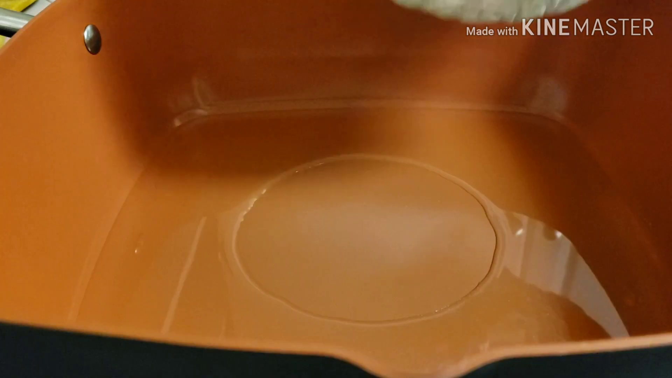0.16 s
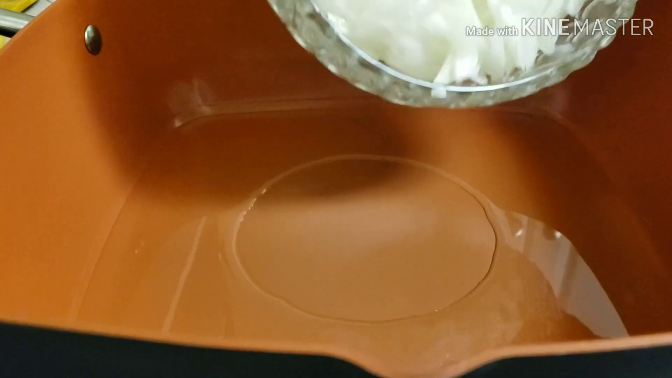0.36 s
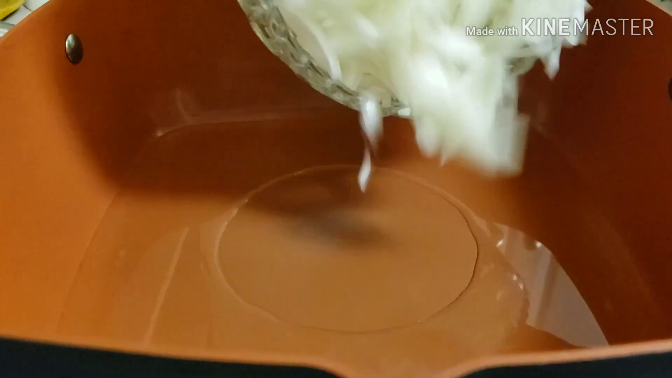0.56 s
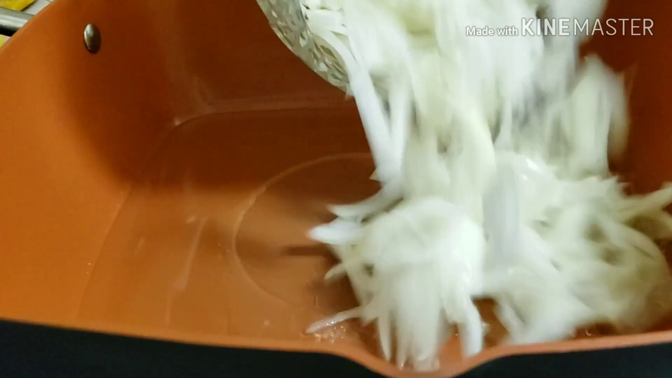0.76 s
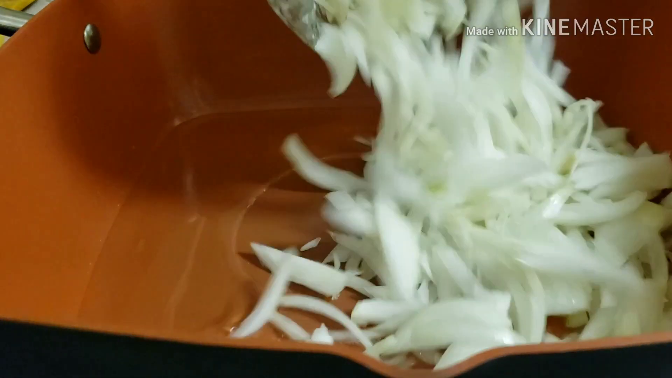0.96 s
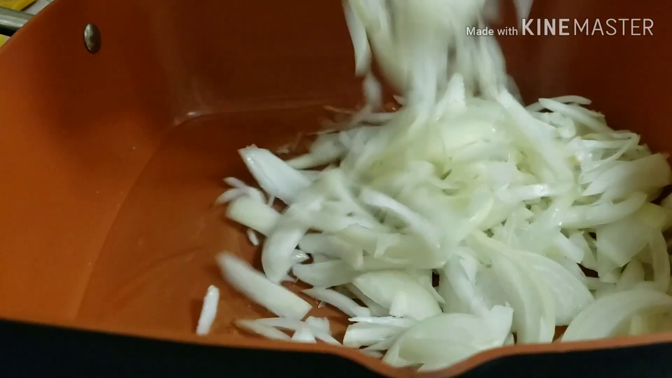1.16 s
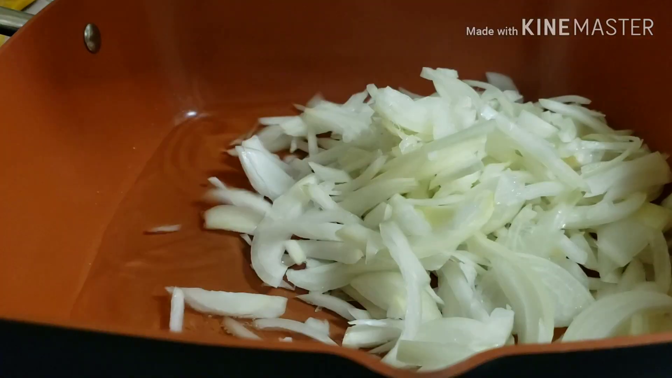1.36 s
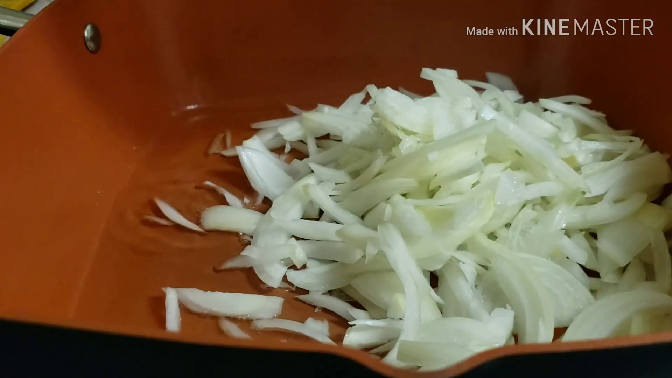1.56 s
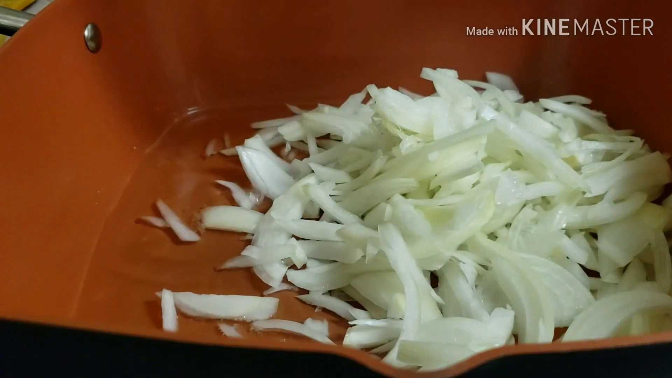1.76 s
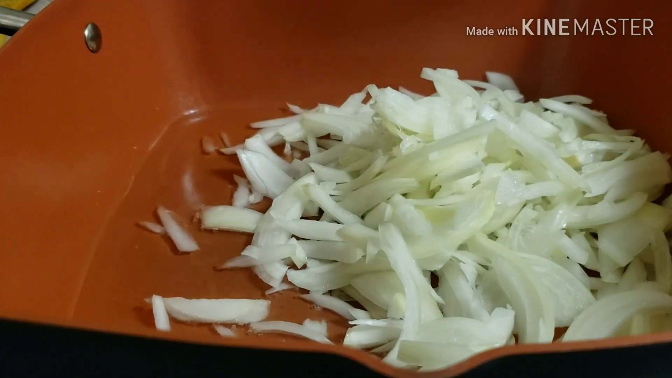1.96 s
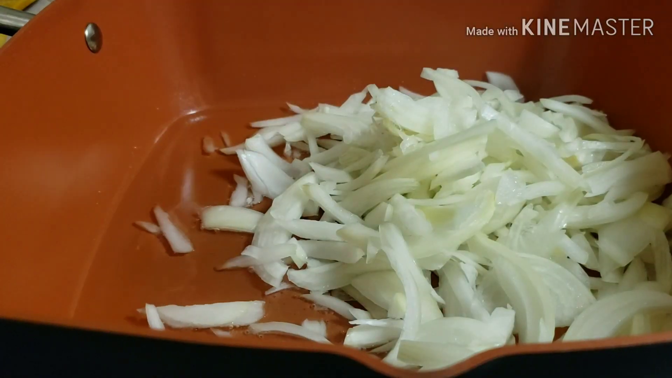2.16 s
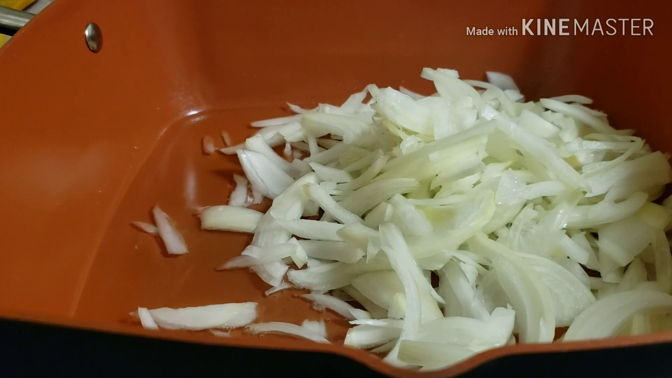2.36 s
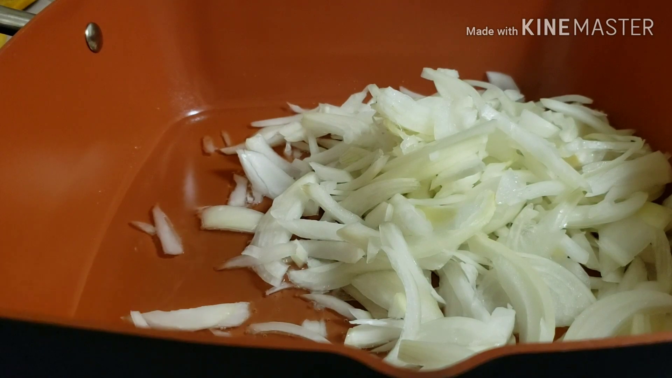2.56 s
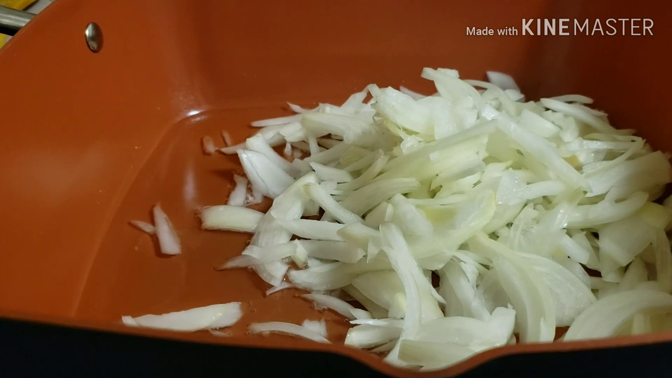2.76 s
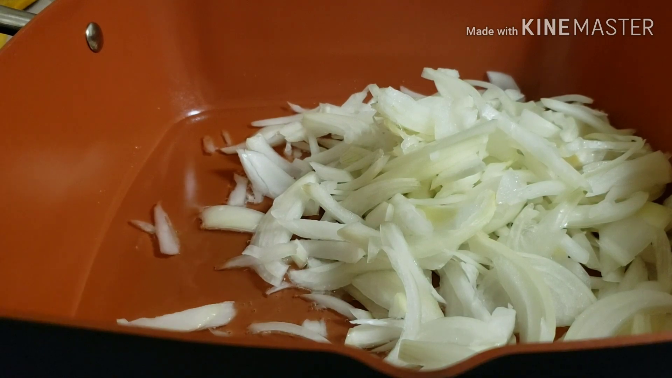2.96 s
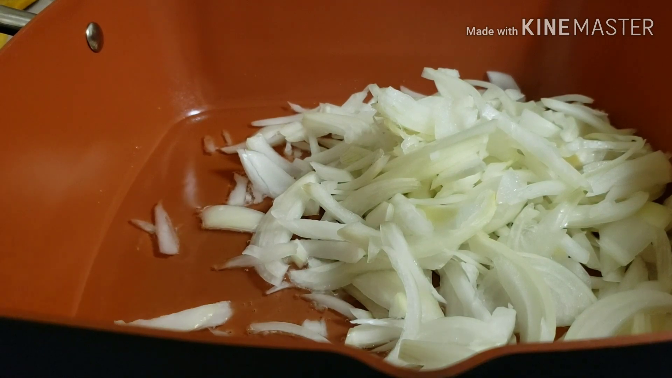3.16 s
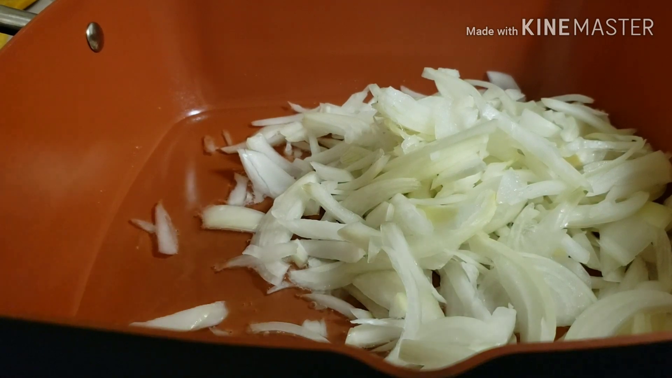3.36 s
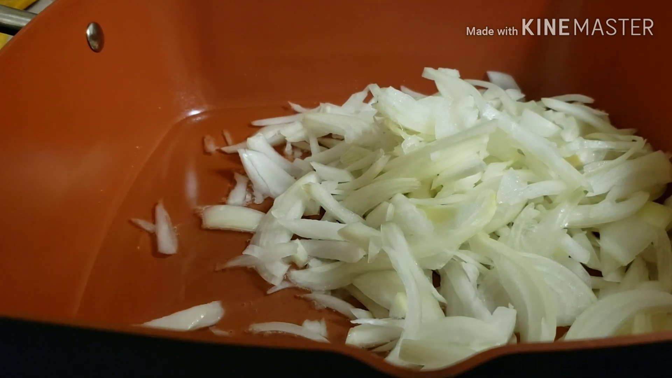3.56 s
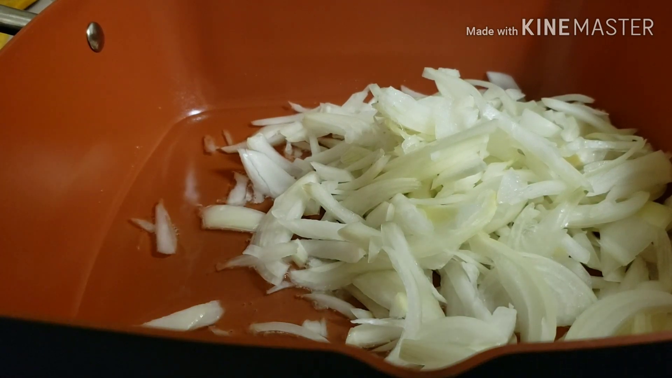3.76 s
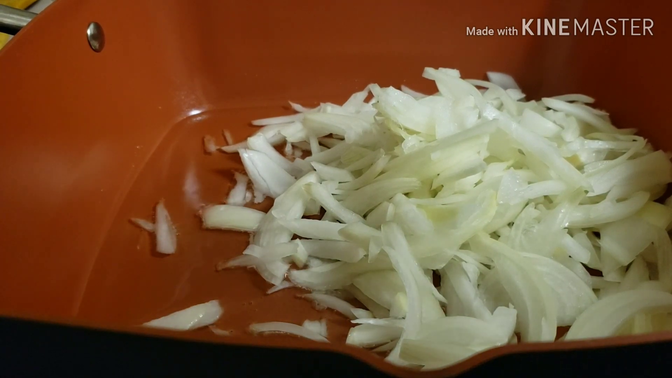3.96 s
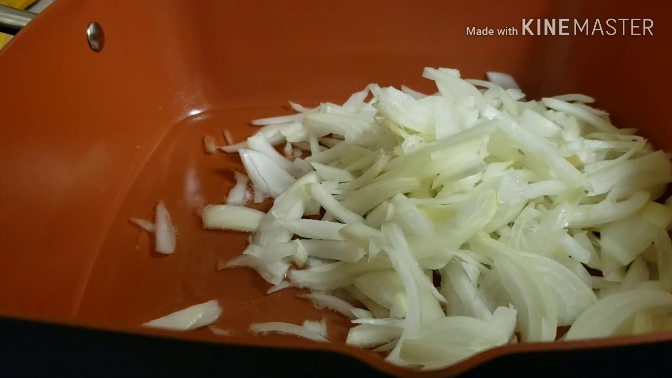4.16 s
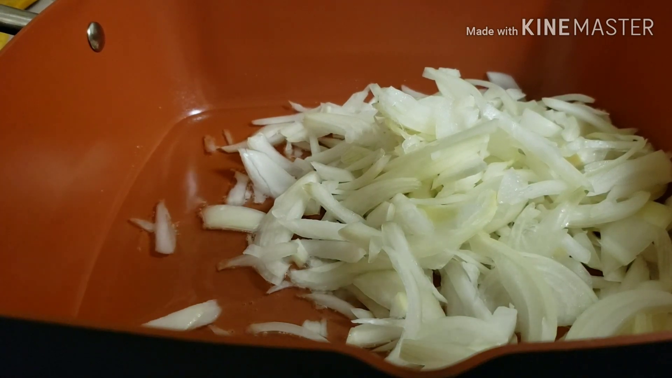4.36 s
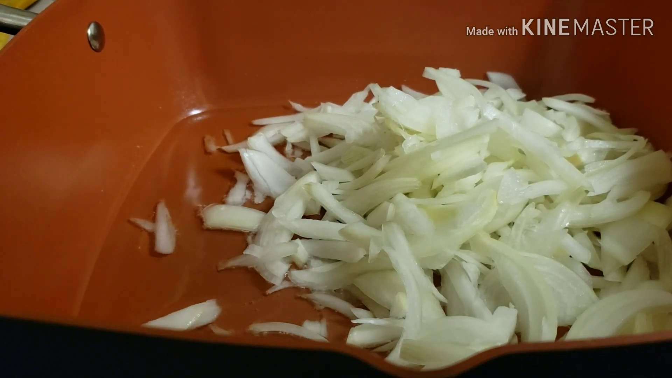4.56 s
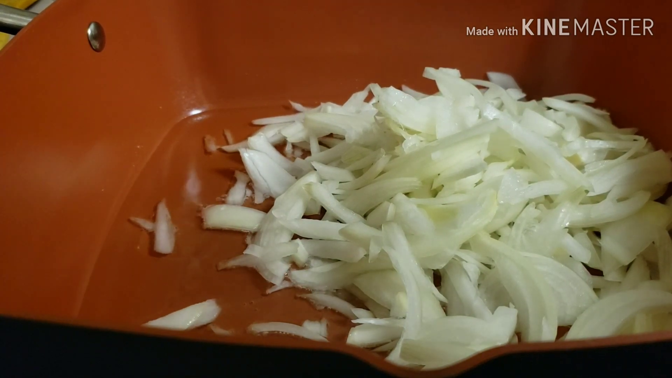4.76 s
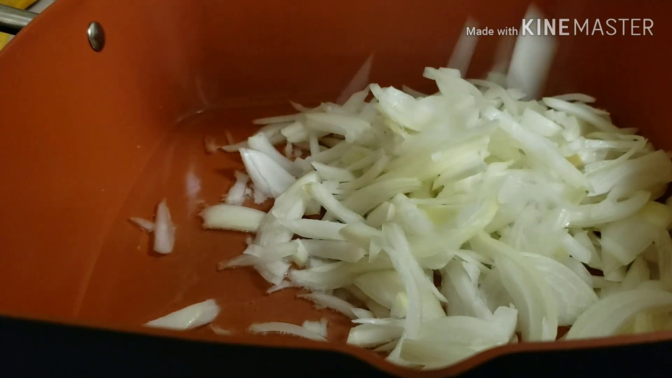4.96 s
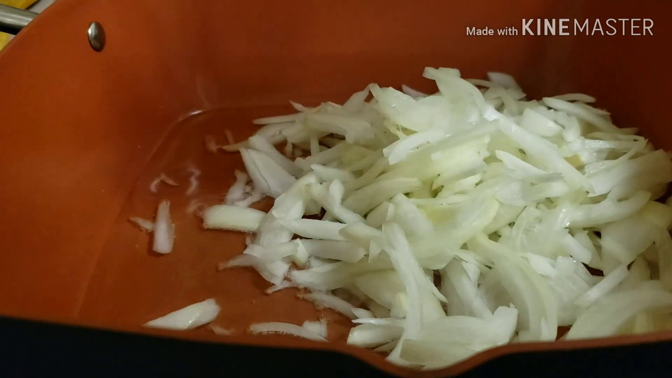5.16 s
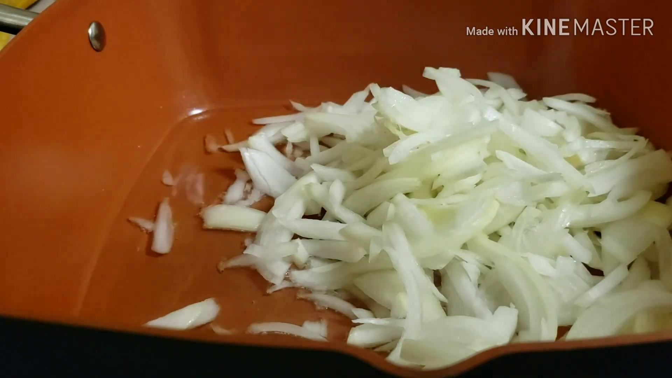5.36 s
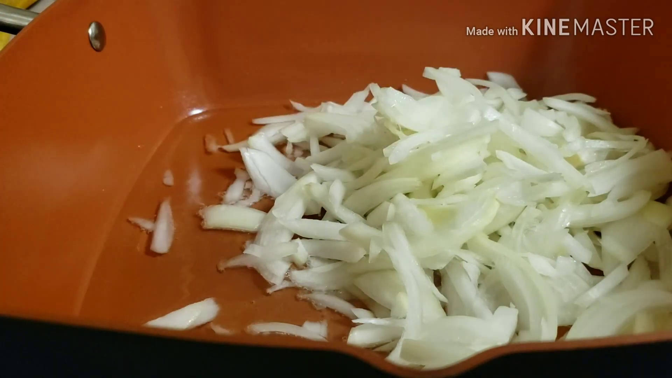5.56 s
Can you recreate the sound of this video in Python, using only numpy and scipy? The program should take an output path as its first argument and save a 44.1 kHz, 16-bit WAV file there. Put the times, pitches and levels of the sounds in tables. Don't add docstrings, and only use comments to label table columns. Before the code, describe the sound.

Close stereo pickup of a pot on the stove: quiet low rumble first, then one loud hard clack of glass on the rim, wet slices landing dully and a crisp sizzle rising at once. The frying stays steady and fine-grained. A quick clattering bounce of the bowl on the counter follows, then late popping spits of oil, in a small kitchen with short reflections.

```python
import sys
import numpy as np
from scipy import signal
from scipy.fft import rfft, irfft, next_fast_len
from scipy.io import wavfile
from scipy.ndimage import uniform_filter1d

SR = 44100
rng = np.random.default_rng(int(sys.argv[2]) if len(sys.argv) > 2 else 0)


def gain_from_db(level_db):
    decades = np.asarray(level_db, float) / 20
    return 10 ** decades


def log_audio(samples):
    frames = np.atleast_2d(samples).T
    limited = np.clip(frames, -1, 1)
    pcm = np.round(limited * 32767).astype(np.int16)
    wavfile.write(sys.argv[1], SR, pcm)


N = 247842
SIZE = next_fast_len(N + SR)
HZ = np.arange(SIZE // 2 + 1) * SR / SIZE + 1e-3
TIME_S = np.arange(N) / SR

# frequency in Hz, level in dB per Hz.
KITCHEN_COLOUR = [(15, -44), (25, -28), (38, -10.5), (70, -4), (102, -14.5), (133, -9), (189, -18.5),
                  (291, -20.5), (333, -19), (382, -26.5), (461, -25), (513, -27), (1980, -51),
                  (7630, -56.5), (15800, -66)]
# centre in Hz, width in Hz, level in dB.
FAN = (126, 7, -57)
# centre in seconds, half length in seconds, added level in dB.
SHAKE = (2.93, 0.18, 5.3)
# frequency in Hz, t60 in seconds.
ROOM_T60 = [(100, 0.43), (600, 0.57), (1500, 0.42), (4000, 0.24), (12000, 0.18)]
# frequency in Hz, likeness 0 to 1.
ALIKE = [(60, 1), (130, 0.98), (290, 0.83), (640, 0.29), (1100, 0.08), (1700, 0.79), (3100, 0.21),
         (6000, 0)]
# frequency in Hz, left minus right in dB.
LEFT_DB = [(60, 1.5), (110, 3.5), (200, 1), (380, -1.5), (700, 1), (1290, 1.5), (2380, 1), (4400, 1),
           (8120, 2.5), (15000, 4.5)]

# start in seconds, thud level in dB.
BOUNCES = [(2.7487, -22.5), (2.7526, -22.5), (2.7565, -22.5), (2.77, -28), (2.787, -32), (2.819, -29.5),
           (2.85, -50), (2.93, -27), (2.938, -26.5), (2.95, -37), (2.961, -30), (2.975, -32), (2.993, -21),
           (2.998, -22.5), (3.011, -21.5), (3.034, -29.5), (3.069, -31.5), (3.568, -43), (4.447, -39)]
# frequency in Hz, level in dB, t60 in seconds.
COUNTER_MODES = [(450, -26, .03), (600, 1, 0.017), (678, -7, 0.092), (800, -12, 0.054), (896, -2.5, 0.1),
                 (1050, -3, 0.028), (1217, -1.5, .05), (1380, -4, 0.034), (1680, -13, 0.093),
                 (1890, -13, 0.1)]
# frequency in Hz, t60 in seconds.
BOWL_MODES = [(2835, 0.83), (1148, 0.97), (4880, .2)]
# frequency in Hz, level in dB.
CLATTER_COLOUR = [(150, -25), (350, -7), (1000, 0.5), (1600, -4), (2400, -15), (5000, -19)]
# start in seconds, level in dB, free ringing in seconds.
HIGH_RINGS = [
    (2.7526, -28.5, 0.039),
    (2.85, -46, .018),
    (2.931, -43, .041),
    (2.998, -25, 0.032),
    (3.037, -33.5, 0.023),
    (3.066, -42, .034),
]
# start in seconds, level in dB, free ringing in seconds.
LOW_RINGS = [
    (2.7576, -37, 0.046),
    (2.818, -38.5, 0.092),
    (3.011, -38.5, .18),
    (3.568, -49, .18),
]

# start in seconds, blow level in dB.
BLOWS = [
    (.6563, -2.5),
    (.6615, -11.5),
    (.6685, -19),
    (.778, -27),
]
# frequency in Hz, level in dB per Hz.
BLOW_COLOUR = [(210, -44), (350, 1.5), (957, 1), (2000, -8), (2540, -4), (4840, 0), (5840, -9), (7160, 1),
               (8000, -5), (9510, -6.5), (15000, -25)]
# frequency in Hz, level in dB, t60 in seconds.
POT_MODES = [(82.4, -19, 0.39), (117, -20, 0.38), (140, -17.5, 0.4), (170.8, -16.5, 0.32), (206, -20, 0.35),
             (260.5, -18, 0.31), (453, -20, 0.31), (536, -21, 0.41), (611, -18.5, 0.34), (679, -18.5, 0.49),
             (854, -3, 0.085), (996.3, -9.5, 0.36), (1167, -8, 0.051), (1540, -15, 0.088),
             (1680, -15, 0.21), (2015, -11.5, 0.12), (2233, -5.5, 0.13), (2330, -15, 0.15),
             (2403, -4.5, 0.15), (2720, -11, 0.11), (3400, -4, 0.05), (3724, -12.5, 0.15)]

# time in seconds, level in dB.
FLOPS = [
    (.782, -42),
    (.85, -50.5),
    (1.142, -54),
]
# from seconds, to seconds, level in dB.
TRICKLE = (0.7, 1.35, -59)
# frequency in Hz, level in dB.
FLOP_COLOUR = [(150, -14), (350, -5), (600, -0.5), (900, -8), (1500, -14), (3000, -34)]
# start in seconds, peak in dB, pitch in Hz, t60 in seconds, left minus right in dB.
SPITS = [(2.1724, -23.5, 5040, .008, 1), (3.2923, -28.5, 4570, 0.018, 1), (3.71, -35, 3400, 0.013, 8),
         (4.3536, -30.5, 4660, .015, 13), (4.415, -22.5, 7750, .02, -0.5), (4.4274, -38, 4500, .015, 6),
         (4.4568, -36, 6000, 0.0055, 0), (4.7294, -29, 4510, 0.017, 10), (4.578, -29, 12000, .008, 0),
         (4.8524, -29, 12100, .012, -9), (4.854, -22.5, 7900, 0.013, 2), (5.4288, -22, 4470, 0.022, 8.5),
         (5.438, -25, 4570, 0.016, 2), (5.483, -37, 4620, 0.027, 0), (5.499, -32, 4580, 0.018, 8),
         (5.5833, -25.5, 3300, 0.0057, 3), (5.5844, -23.5, 3960, 0.029, 6), (5.594, -33, 3780, .025, 0)]
# time in seconds, level in dB.
BOIL = [(0.68, -53), (0.72, -47), (0.8, -50), (0.84, -43.5), (1.08, -41.5), (1.27, -39), (1.44, -40.5),
        (1.82, -42), (2.17, -42), (2.34, -43.5), (2.81, -44), (3.51, -44), (3.89, -42.5), (4.02, -42),
        (4.53, -41.5), (5.15, -43.5), (5.62, -42)]
# frequency in Hz, level in dB per Hz.
SIZZLE_COLOUR = [(350, -18), (600, -12), (1340, -16.5), (1600, -4), (1830, -8.5), (2020, -3.5), (2440, -6),
                 (2690, -3), (4570, -0.5), (5770, -3), (7780, -0.5), (9170, -5.5), (12400, 0),
                 (15600, -6.5)]


def on_hz(table, hz=HZ):
    f, v = np.transpose(table)
    return np.interp(np.log(hz), np.log(f), v)


def on_time(table):
    return np.interp(TIME_S, *np.transpose(table))


def shape(x, gain):
    return irfft(rfft(x, SIZE) * gain, SIZE)[..., :N]


def causal(gain):
    cepstrum = irfft(np.log(gain), SIZE)
    cepstrum[1:SIZE // 2] *= 2
    cepstrum[SIZE // 2 + 1:] = 0
    return np.exp(rfft(cepstrum))


def level(x, db):
    return x * gain_from_db(db) / np.sqrt(np.mean(x ** 2))


def add(out, start_s, sound):
    i = int(start_s * SR)
    out[:, i:i + sound.shape[1]] += sound[:, :N - i]


def ports(both, own, gain):
    alike = np.clip(on_hz(ALIKE), 0, 1)
    heard = rfft(both, SIZE) * np.sqrt(alike) + rfft(own, SIZE) * np.sqrt(1 - alike)
    return irfft(heard * gain, SIZE)[:, :N]


def walk(rate_hz):
    hold = int(SR / rate_hz)
    steps = np.repeat(rng.standard_normal(N // hold + 1), hold)
    return 1.39 * uniform_filter1d(uniform_filter1d(steps, hold), hold)[:N]


def grains(rate_hz, spread_db):
    happens = rng.random(N) < rate_hz / SR
    size = happens * gain_from_db(spread_db * np.minimum(rng.exponential(size=N), 4))
    return level(size * rng.standard_normal((3, N)), 0)


def mode(t, hz, t60_s, phase=0):
    return np.sin(2 * np.pi * hz * t + phase) * gain_from_db(-60 * t / t60_s)


def kitchen():
    rumble_db, rise_db_per_s, hiss_db = -53, 1.31, -46
    fan_hz, fan_width_hz, fan_db = FAN
    shake_s, shake_half_s, shake_db = SHAKE
    noise = rng.standard_normal((6, N))
    air = level(ports(noise[0], noise[1:3], gain_from_db(on_hz(KITCHEN_COLOUR))), 0)
    deep = shape(air, 1 / (1 + (HZ / 300) ** 4))
    fan_band = 1 / (1 + (2 * (HZ - fan_hz) / fan_width_hz) ** 2)
    drone = level(ports(noise[3], noise[4:], fan_band), fan_db)
    shaking_db = shake_db * np.exp(-((TIME_S - shake_s) / shake_half_s) ** 2)
    deep_db = rumble_db + rise_db_per_s * TIME_S + shaking_db + 1.1 * walk(16)
    return deep * gain_from_db(deep_db) + drone + (air - deep) * gain_from_db(hiss_db)


def room(gap_s=0.0027):
    noise = rfft(ports(rng.standard_normal(N), rng.standard_normal((2, N)), 1), SIZE)
    t, tail = TIME_S[:SR], 0
    for hz in 60 * 4. ** np.arange(5):
        band = np.clip(1 - abs(np.log2(HZ / hz)) / 2, 0, 1)
        tail = tail + irfft(noise * band, SIZE)[:, :SR] * gain_from_db(-60 * t / on_hz(ROOM_T60, hz))
    tail = tail * (1 - np.exp(-t / gap_s))
    return rfft(tail / np.sqrt(np.sum(tail ** 2) / 2), SIZE)


def rattle():
    high_still_db_per_s, low_still_db_per_s, wobble_db = 1500, 600, 0.9
    knocks, glass, rough = np.zeros((2, N)), np.zeros((2, N)), np.zeros((3, N))
    t = TIME_S[:SR // 2]
    soft, swing = 1 - np.exp(-t / 0.00054), 1 - np.exp(-t / 0.0013)
    touches = rng.standard_normal((len(BOUNCES), len(COUNTER_MODES), 2, 1))
    for (start_s, thud_db), touch in zip(BOUNCES, touches):
        wood = 0
        for (hz, db, t60_s), phase in zip(COUNTER_MODES, touch):
            wood = wood + gain_from_db(db) * mode(t, hz, t60_s, 1.46 * phase)
        add(knocks, start_s, gain_from_db(thud_db - 8) * soft * wood)
        scrape = np.exp(-t / 0.0075) * rng.standard_normal((3, len(t)))
        add(rough, start_s, gain_from_db(thud_db + 8.5) * soft * scrape)
    for start_s, db, free_s in HIGH_RINGS:
        stilled = gain_from_db(db - high_still_db_per_s * np.maximum(t - free_s, 0))
        high = (mode(t, *BOWL_MODES[0]) + 0.16 * mode(t, *BOWL_MODES[2])) * stilled
        add(glass, start_s, np.outer([1.15, .8], high * swing))
    for start_s, db, free_s in LOW_RINGS:
        low = mode(t, *BOWL_MODES[1]) * gain_from_db(db - low_still_db_per_s * np.maximum(t - free_s, 0))
        add(glass, start_s, np.outer([1.2, .5], low * swing))
    clatter = ports(rough[0], rough[1:], causal(gain_from_db(on_hz(CLATTER_COLOUR))))
    return knocks + clatter, glass * gain_from_db(wobble_db * walk(40))


def crack():
    edge, chatter, modes = np.zeros((2, N)), np.zeros((3, N)), np.zeros((2, N))
    t, blow_s = TIME_S[:SR // 2], BLOWS[0][0]
    click = mode(t, 1680, 0.0033) + .5 * mode(t, 5850, 0.0035)
    add(edge, blow_s, np.outer([-.95, .2], click * (1 - np.exp(-t / 0.00022))))
    for start_s, db in BLOWS:
        add(chatter, start_s + .0004, gain_from_db(db) * np.exp(-t / 0.004) * rng.standard_normal((3, len(t))))
    turns = rng.standard_normal((len(POT_MODES), 2, 1))
    for (hz, db, t60_s), turn in zip(POT_MODES, turns):
        phase = turn * min(hz / 900, 1)
        unrest = gain_from_db(2.7 * min(600 / hz, 1) * walk(40.5)[:len(t)])
        build_up = 1 - np.exp(-t * hz / 2)
        add(modes, blow_s, gain_from_db(db - 14.5) * unrest * mode(t, hz, t60_s, phase) * build_up)
    spray = ports(chatter[0], chatter[1:], causal(gain_from_db(on_hz(BLOW_COLOUR))))
    return edge + gain_from_db(-0.5) * spray, modes


def flops():
    rise_s, fall_s = 0.021, 0.022
    from_s, to_s, trickle_db = TRICKLE
    pats = grains(rate_hz=1500, spread_db=2.5)
    weight = gain_from_db(trickle_db) * (TIME_S > from_s) * (TIME_S < to_s)
    for land_s, db in FLOPS:
        swell = np.exp(np.minimum((TIME_S - land_s) / rise_s, (land_s - TIME_S) / fall_s))
        weight = weight + gain_from_db(db) * swell
    return level(ports(pats[0], pats[1:], gain_from_db(on_hz(FLOP_COLOUR))), 0) * weight


def spits():
    out, t = np.zeros((2, N)), TIME_S[:SR // 10]
    detunes = rng.standard_normal((len(SPITS), 2, 1))
    for (start_s, db, hz, t60_s, pan_db), detune in zip(SPITS, detunes):
        pair = mode(t, hz * (1 + 0.008 * detune), t60_s)
        pair = pair + .5 * mode(t, hz * (1.06 + 0.0088 * detune), t60_s)
        snap = 0.47 * mode(t, 0.85 * hz, .005)
        gain = gain_from_db(db + np.array([[.5], [-.5]]) * pan_db)
        add(out, start_s, gain * (pair + snap) * (1 - np.exp(-t / .00015)))
    return out


def sizzle():
    soak_s, soak_takes_s, splash_db = 0.83, 0.036, 0.5
    flare_db, flare_s, fine_db_per_s = 4, 0.32, 0.03
    mid_follow, large_follow, large_db_per_s = 0.78, 0.79, 0.27
    large_wait_db, large_takes_s = 3.8, .4
    main_db = on_time(BOIL)
    boil_db = main_db - np.median(main_db)
    since_s = np.maximum(TIME_S - soak_s, 0)
    soaked = np.clip(since_s / soak_takes_s, 0, 1)
    fine_db = flare_db * np.exp(-since_s / flare_s) + fine_db_per_s * (TIME_S - 3)
    mid_db = (mid_follow - 1) * boil_db
    large_db = (large_follow - 1) * boil_db + large_db_per_s * (TIME_S - 3)
    wait_db = large_wait_db * np.exp(-since_s / large_takes_s)
    snaps = gain_from_db(-12) * grains(rate_hz=2500, spread_db=3)
    swell_db, out = 0.47 * walk(30), 0
    for hz in 700 * 2 ** np.arange(0, 4.6, .5):
        band = np.sqrt(np.clip(1 - 2 * abs(np.log2(HZ / hz)), 0, 1)) * gain_from_db(on_hz(SIZZLE_COLOUR))
        bursts = grains(rate_hz=2 * hz, spread_db=2.5) + snaps
        if hz > 9000:
            own_db = fine_db
        elif hz > 2900:
            own_db = mid_db
        else:
            own_db = large_db - wait_db * 1000 / hz
        if 5000 < hz < 9000:
            own_db = 0
        else:
            own_db = soaked * own_db + (1 - soaked) * splash_db
        out = out + ports(bursts[0], bursts[1:], band) * gain_from_db(own_db + swell_db + 0.48 * walk(17))
    start = np.clip((TIME_S - .657) / 0.024, 0, 1)
    return level(out, 8.06) * gain_from_db(main_db) * start


def scene():
    fry = sizzle() + flops() + spits()
    knocks, glass = rattle()
    edge, modes = crack()
    wet = gain_from_db(-10.5) * fry + gain_from_db(-9.5) * knocks + gain_from_db(-13) * glass
    wet = wet + gain_from_db(-6.5) * edge + gain_from_db(-11.5) * modes
    return fry + knocks + glass + edge + modes + shape(wet, room()) + kitchen()


def roll_off(x):
    return signal.sosfilt(signal.butter(12, 16810, fs=SR, output="sos"), x)


def record(dry):
    lead_s, top_hz = 2 / 44100, 15640
    balance = gain_from_db(np.outer([.5, -.5], on_hz(LEFT_DB)))
    delay = np.exp(-2j * np.pi * np.outer([0, lead_s], HZ))
    rounded = np.tanh(shape(dry, balance * delay) / 1.6) * 1.598
    top_cut = causal(gain_from_db(-60 * np.clip((HZ - top_hz) / 120, 0, 1)))
    return roll_off(shape(rounded, top_cut))


dry = scene()
out = record(dry)
log_audio(out)
```